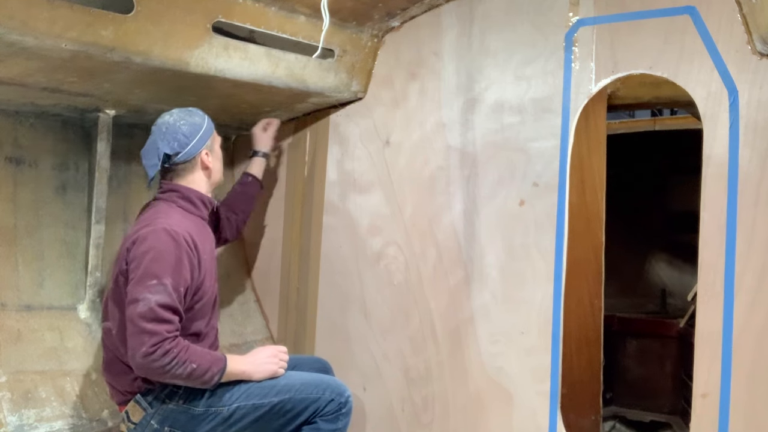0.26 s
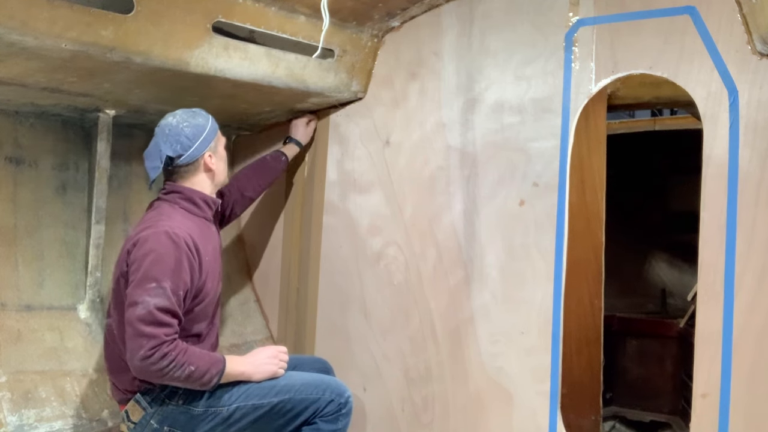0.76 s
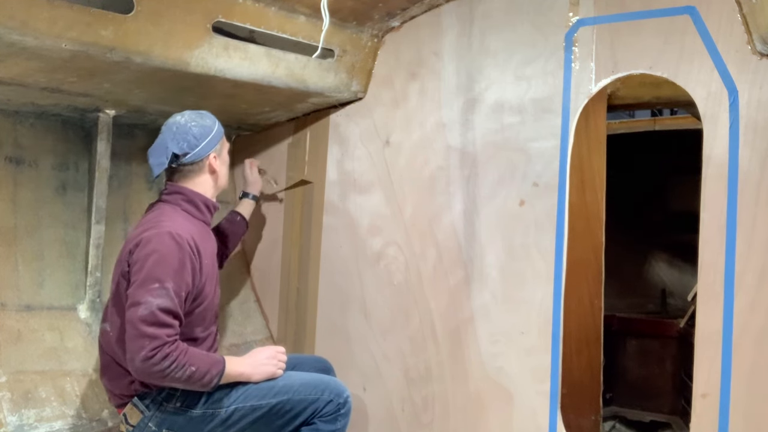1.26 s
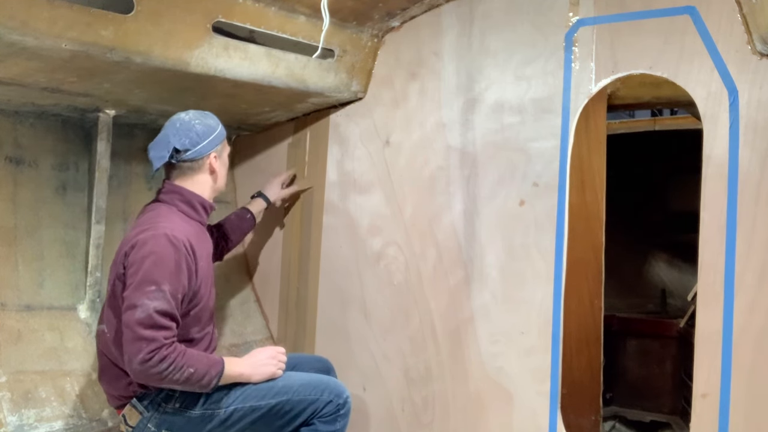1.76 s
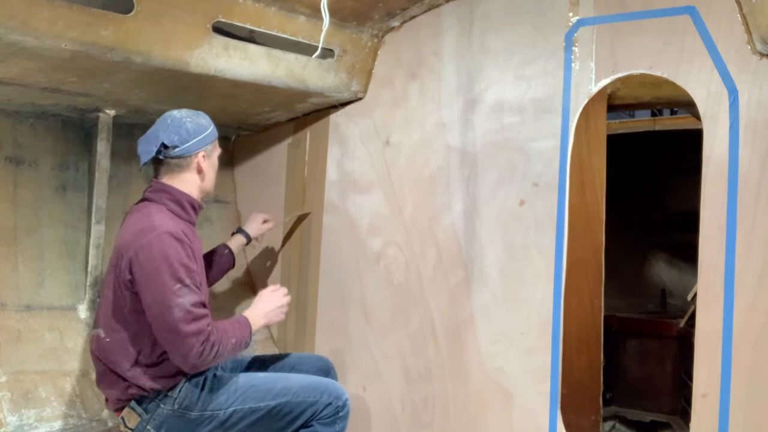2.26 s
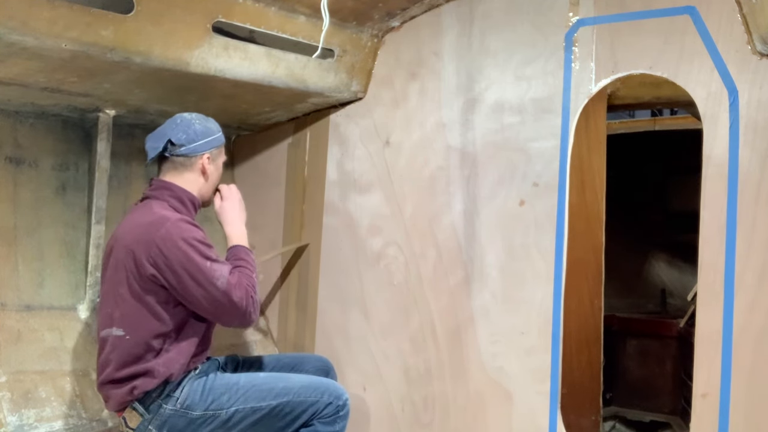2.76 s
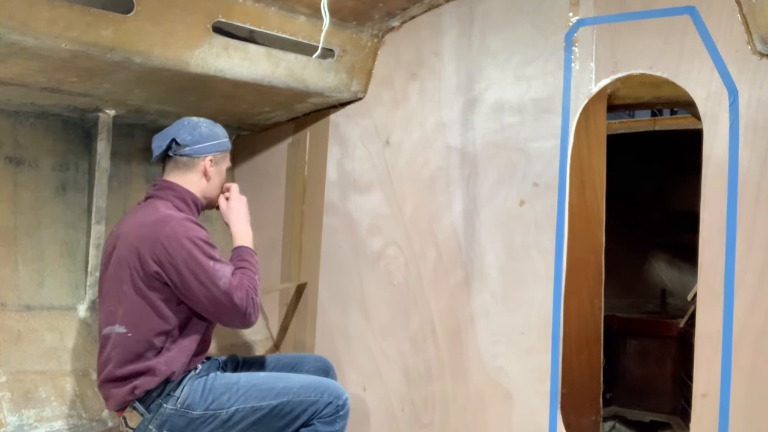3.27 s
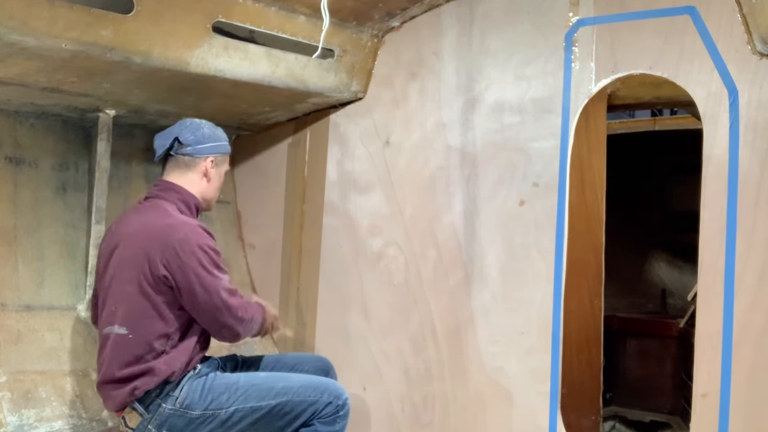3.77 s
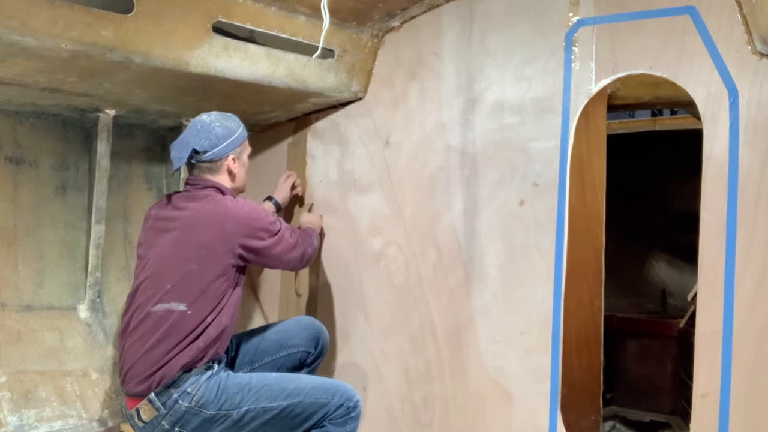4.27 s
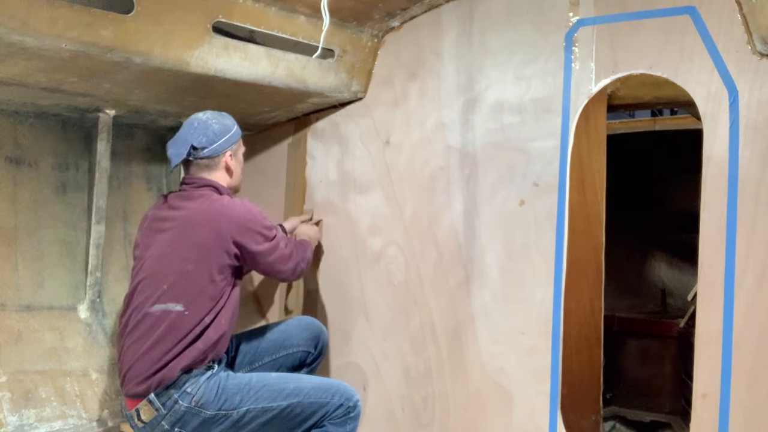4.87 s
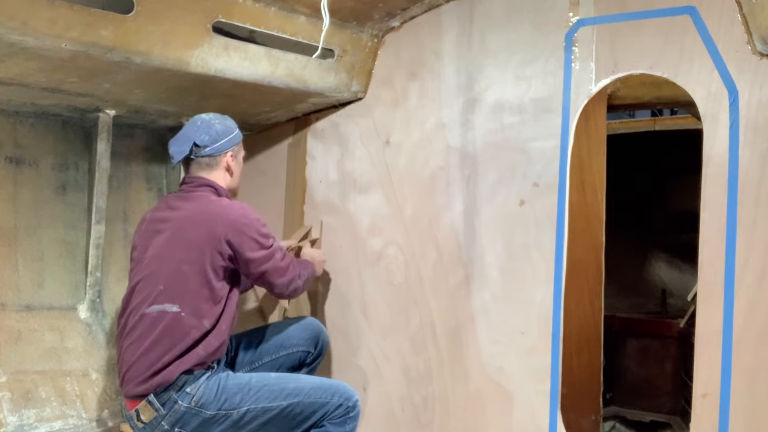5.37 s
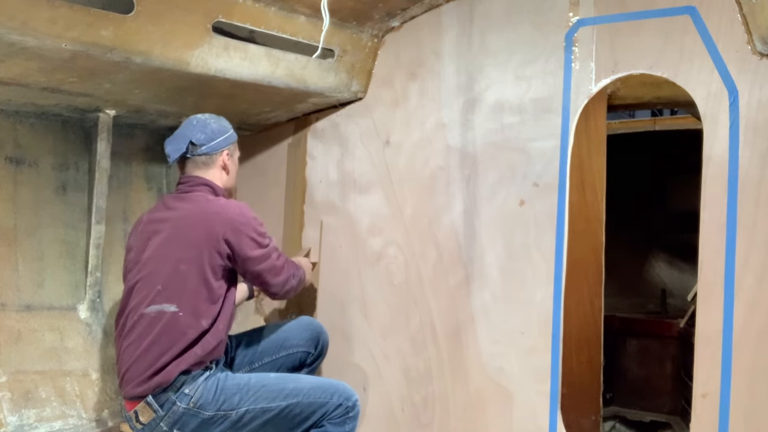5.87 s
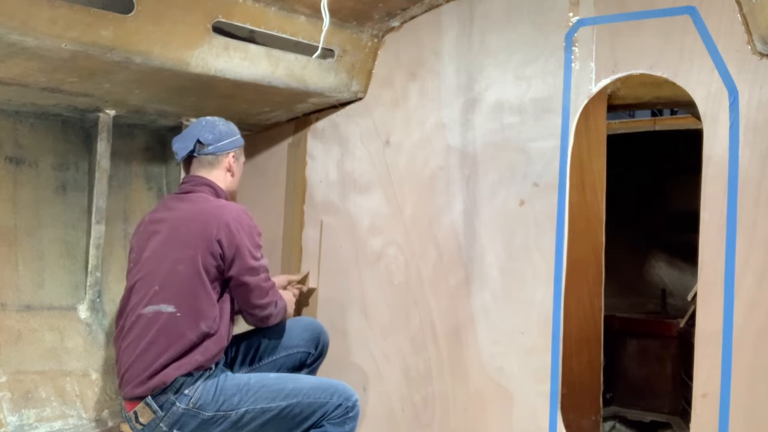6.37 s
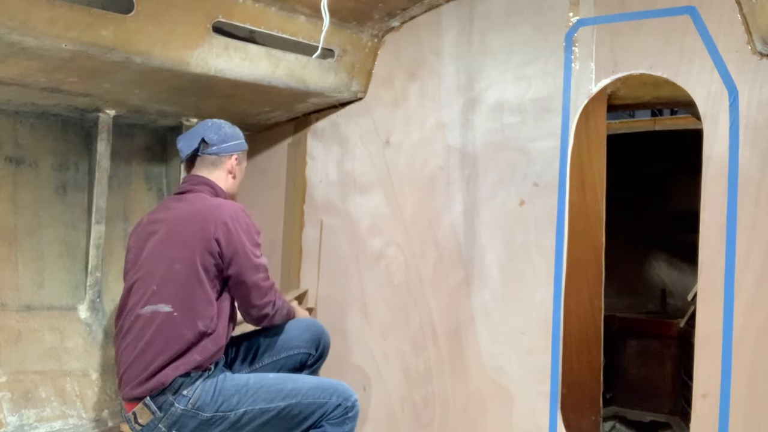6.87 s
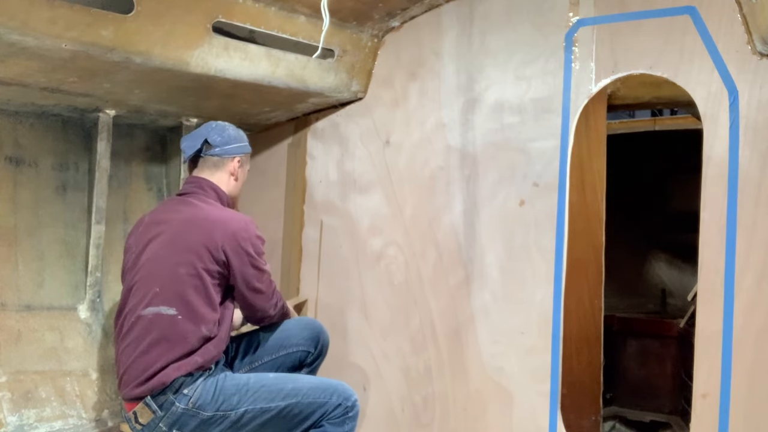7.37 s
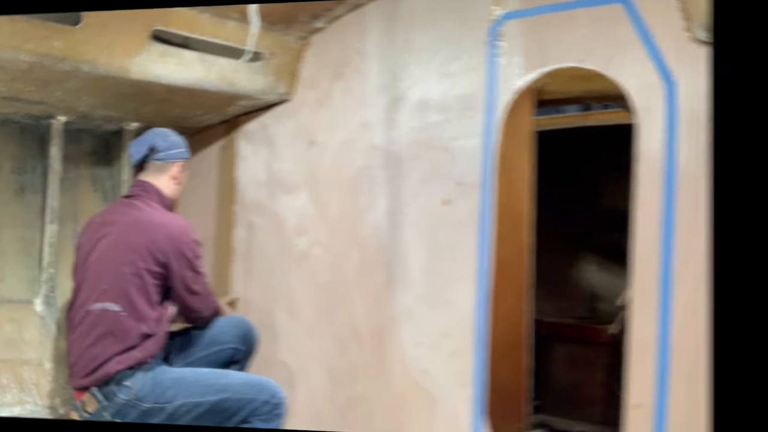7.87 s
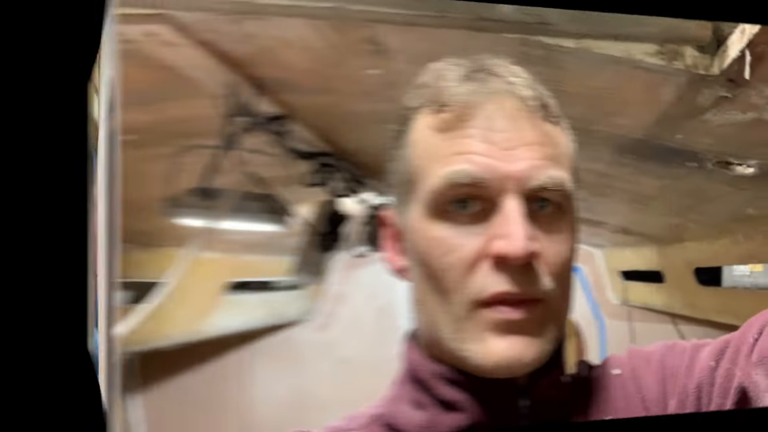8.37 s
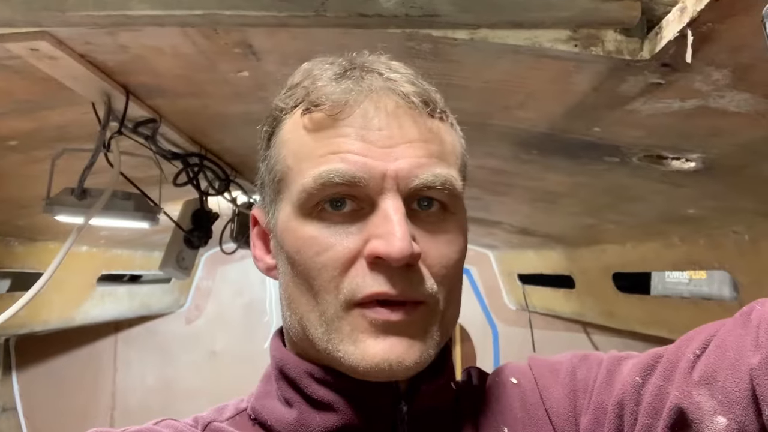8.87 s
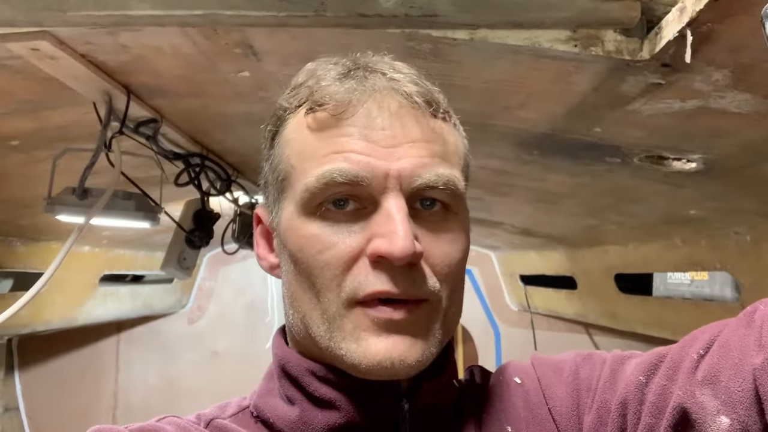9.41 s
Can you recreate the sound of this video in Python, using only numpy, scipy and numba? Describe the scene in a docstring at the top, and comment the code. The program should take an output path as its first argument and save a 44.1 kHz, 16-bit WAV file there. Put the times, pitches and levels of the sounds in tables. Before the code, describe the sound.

In a small, hard, bare boat hull, film-wrapped battens are pulled from glued plywood, heard in stereo from a short distance with brief boxy reverberation. A clipped tail of a snap opens, then sparse faint crinkles until 0.9 s. At 0.95-1.15 a fuller woody crackle breaks loose with a low boom. A light knock with a rip comes at 1.5. From 1.8 to 3.2 long, strong tearing pulls overlap; a hard pop lands at 3.5. From 3.9 to 4.8 it is quiet, with tiny crisp ticks. Sharp clusters crack at 5.2 and 5.45, the latter loudest, with a barely audible knock. Rustling pulls continue from 6.1 to 7, then bright, fizzy crackling at 7.1-7.55 and a last small snap at 7.8. A faint hollow drone fades around 8.4. Soft room air remains, with one short crisp hiss, perhaps parting lips, at 8.6.

```python
"""Inside a bare boat hull, plastic-wrapped battens are peeled off glued plywood.
The film lets go in dense random snaps, in long pulls and quick rips; larger creases crack one by one.
Filters colour the snaps as taut film, slack sheet and plywood; noise through low modes makes the bulkhead boom.
Decaying noise gives film and knocks a short reverberation. A faint drone and room noise lie beneath;
one brief, crisp hiss of filtered noise comes near the end, perhaps lips parting near the microphone."""
import sys
import numpy as np
from scipy import signal
from scipy.fft import rfft, irfft, next_fast_len
from scipy.io import wavfile
from scipy.ndimage import uniform_filter1d
from numba import njit

SR = 44100
rng = np.random.default_rng(int(sys.argv[2]) if len(sys.argv) > 2 else 0)


def generate_wav(sig):
    """Save sig (samples, or channels by samples) to the path in sys.argv[1] as 16-bit PCM at SR."""
    pcm = np.round(np.clip(np.atleast_2d(sig).T, -1, 1) * 32767).astype(np.int16)
    wavfile.write(sys.argv[1], SR, pcm)


N = 425124
T = np.arange(N) / SR

# pulls on the film: start_s, rise_s, hold_s, fade_db_per_s, level_db,
# then relative to that level: body_db, flutter_db (slack sheet), fizz_db; last, on its own scale: boom_db
TUGS = [ (0.0, 0.0006, 0.0013, 186, -21.5, -25.5, -10.5, -3.5, -42),
        (0.28, 0.011, 0.018, 61, -58, -8.5, 1, -4, -53), (0.46, 0.009, 0.032, 150, -57, -16, -15, -7, -62),
        (0.5, 0.015, 0.28, 40, -69.5, -2.5, 2, -3, -49.5),
        (0.712, 0.012, 0.15, 100.2, -45.5, -7, -3, 8, -45.5),
        (0.85, 0.053, 0.047, 130, -36.5, -21, -4, -6, -58),
        (0.957, 0.014, 0.15, 230, -34, -1.5, 5.5, 0.5, -32.5),
        (1.21, 0.011, 0.025, 150, -43.5, -10, -10, -5, -39.5),
        (1.293, 0.0063, 0.011, 349, -39, -11, -5, 4, -54.5),
        (1.335, 0.018, 0.0066, 148, -32, -20, -9.5, -3, -48.5),
        (1.489, 0.0092, 0.031, 108.5, -31.5, -7.5, -4, -0.5, -36),
        (1.738, 0.0029, 0.007, 120.6, -39.5, -18.5, -9.5, 3, -44),
        (1.831, 0.1, 0.1, 108, -20.5, -12.5, -7, -6.5, -44),
        (2.019, 0.047, 0.09, 170, -19.5, -18.5, -12, -4, -44.5),
        (2.19, 0.027, 0.21, 86.64, -23, -18.5, -12.5, -0.5, -48.5),
        (2.46, 0.038, 0.025, 160, -22.5, -21, -16.5, -1, -39.5),
        (2.52, 0.066, 0.29, 50, -32, -16, -6, -1, -39), (2.8, 0.13, 0.34, 192, -24, -17, -16, -2, -61),
        (3.095, 0.038, 0.15, 110, -34, -9, -1.5, -1, -41), (3.37, 0.0089, 0.01, 154, -45, -2, -1, -13, -37),
        (3.504, 0.014, 0.1, 127, -27, -18.5, -15.5, -1, -40.5),
        (3.868, 0.011, 0.14, 50, -52, -19, -7.5, -5, -64),
        (4.028, 0.0039, 0.17, 75, -57.5, 2, 12, -15, -43.5),
        (4.122, 0.0024, 0.0074, 260, -43, -29, -3, 8, -50.5),
        (4.321, 0.032, 0.22, 29.76, -51, -10, -3.5, 7, -54.5),
        (4.665, 0.047, .17, 60, -43, -9.5, -4.5, 7, -50),
        (4.86, 0.073, 0.087, 59.3, -36.5, -10.5, -8, 0, -42),
        (5.02, 0.14, .27, 58.4, -39.5, -5, -1, 4.5, -43.5),
        (5.18, 0.014, 0.018, 169.8, -25, -11, -2.5, 0, -51.5),
        (5.427, 0.016, 0.029, 205.7, -20, -7.5, -1, 1.5, -42),
        (5.58, 0.084, 0.26, 70, -34.5, -10.5, -5, -1.5, -43),
        (5.76, 0.13, 0.32, 60, -41.5, -12, -5, -0.5, -39.5),
        (5.875, 0.0076, .01, 250, -52, -20, -11, 16, -59),
        (6.116, 0.02, 0.03, 119.6, -28.5, -16, -13.5, 5.5, -44.5),
        (6.209, 0.016, 0.069, 130, -26.5, -17, -5.5, 4.5, -39),
        (6.299, 0.11, 0.14, 85.7, -29, -13.5, -8.5, 0, -41.5),
        (6.58, 0.13, .23, 59.6, -39.5, -7.5, -5, 7, -46.5),
        (6.73, 0.0073, 0.0095, 129.9, -31.5, -30, -13.5, -1.5, -64.5),
        (6.8, 0.052, 0.09, 78.8, -28, -23, -7.5, -3, -44.5),
        (6.94, 0.061, 0.058, 110.3, -22.5, -18, -27, 5, -47),
        (7.08, 0.013, 0.06, 154.4, -37, -9.5, -1.5, 17.5, -41),
        (7.196, 0.034, 0.083, 150, -28, -19, -3.5, 12, -37.5),
        (7.448, 0.025, 0.051, 118.7, -30.5, -18.5, -3.5, 9.5, -35),
        (7.659, 0.036, 0.072, 69, -49.5, -7.5, 4, -18, -45.5),
        (7.817, 0.0059, 0.056, 180, -38, -20, -8, -6, -60)]
# ringing modes of the plywood: centre_hz, width_hz, level_db
PLYWOOD = [(337, 62, -3.5), (475, 10, 1.5), (546, 22, -2.5), (657, 7.7, 4.5), (703, 41, 5.5),
           (789, 12, 8.5), (946, 13, 10), (1299, 30, 3.5), (1383, 44, 3), (1800, 16, -6.5)]
# low modes of bulkhead and hull: centre_hz, width_hz, level_db
BOOM = [(50, 3, -40.5), (71.64, 5.2, 0), (72.7, 3.2, 9), (111.3, 6.2, 4), (106.2, 4.1, -0.5),
        (116, 1.3, -7), (210, 58, -16.5)]


def undb(db):
    """Amplitude ratio: decibels to gain."""
    return 10 ** (np.asarray(db) / 20)


def unit(x):
    """Normalisation by mean power: scale to rms 1."""
    return x / np.sqrt(np.mean(x ** 2))


def curves(rows):
    """Linear interpolation in time: each column after start_s, at every sample."""
    s, *columns = np.transpose(rows)
    return [np.interp(T, s, column) for column in columns]


def walk(rate_hz):
    """Random modulation: ramps between chance values, rate_hz of them a second, with rms 1."""
    k = int(SR / rate_hz)
    steps = np.repeat(rng.standard_normal(N // k + 1), k)
    return unit(uniform_filter1d(steps, k)[:N])


def colour(x, points):
    """Linear filtering by a broad frequency response; white noise keeps its power."""
    hz, db = np.transpose(points)
    size = next_fast_len(N + 4096)
    grid_hz = np.maximum(np.fft.rfftfreq(size, 1 / SR), 1)
    response = unit(undb(np.interp(np.log(grid_hz), np.log(hz), db)))
    return irfft(rfft(x, size) * response, size)[:N]


def band(x, hz, width_hz):
    """Simple resonance: a second-order peak with gain 1 at its centre."""
    b, a = signal.iirpeak(hz, hz / width_hz, fs=SR)
    return signal.lfilter(b, a, x + 1e-18)


def ring(x, modes):
    """Modal superposition: a bank of resonances; white noise keeps its approximate power."""
    power = sum(undb(db) ** 2 * np.pi * width_hz / SR for _, width_hz, db in modes)
    return sum(undb(db) * band(x, hz, width_hz) for hz, width_hz, db in modes) / np.sqrt(power)


def effort(t, rise_s, hold_s, fade_db_per_s):
    """Force envelope: linear build-up, hold and exponential decay, t seconds after the start."""
    build_up = np.clip(t / max(rise_s, .001), 0, 1)
    return build_up * undb(-fade_db_per_s * np.maximum(t - rise_s - hold_s, 0))


def tugged(levels_db, fades_db_per_s):
    """Incoherent summation: strength of all pulls, whose overlaps add in power."""
    power = np.full(N, 1e-14)
    for (start_s, rise_s, hold_s, *_), db, fade in zip(TUGS, levels_db, fades_db_per_s):
        span = slice(max(int(start_s * SR), 0), int((start_s + 2) * SR))
        power[span] += (undb(db) * effort(T[span] - start_s, rise_s, hold_s, fade)) ** 2
    return np.sqrt(power)


def pulls():
    """Power-weighted mixing: strength of the pull and its (body, flutter, fizz) dB at every sample."""
    *_, fade, db, body_db, flutter_db, fizz_db, _ = np.transpose(TUGS)
    pull = tugged(db, fade)
    tone_db = [20 * np.log10(tugged(db + part_db, fade) / pull) for part_db in (body_db, flutter_db, fizz_db)]
    return pull, tone_db


def radiate(snaps, body_db, flutter_db, fizz_db, wood_db=-5, deep_db=-5):
    """Parallel radiation paths: snaps sound from taut film, slack sheet and the plywood they stick to."""
    # frequency responses, woody body, its lowest tones, slack sheet, taut film, fizz: frequency_hz, level_db
    body_points, deep_points = [(280, -31.5), (470, 1.5), (620, 4.5), (900, 0.5), (1250, -13.5),
                                (2000, -32.5)], [(110, -19), (190, -7), (260, -5), (350, -3), (450, -0.5),
                                              (650, -18), (1200, -44)]
    flutter_points = [(450, -34.5), (800, -9.5), (1150, 0.5), (1900, -0.5), (2700, -5.5), (4200, -15.5),
                      (7000, -29.5)]
    crackle_points, fizz_points = [(900, -37.5), (1800, -9), (2700, -3), (3800, 1.5), (5500, 1),
                                   (7500, 3.5), (9500, -6), (12000, -8), (16000, -27.5)], [(4000, -30), (7000, -8.5), (10000, 4.5), (12300, -2.5),
                                                    (14000, -3.5), (15700, -13.5), (17000, -35.5)]
    # relative level of the lowest wooden tones, which changes with the place on the panel: start_s, level_db
    depth_rows = [(0, 7), (1.0, 2.5), (1.6, 9), (2.1, -12.5), (2.6, 4.5), (3.2, 7), (4.8, 9.5), (5.2, -3),
                  (5.5, -24), (5.7, 4), (6.5, 4.5), (7.5, 12.5)]

    depth_db, = curves(depth_rows)
    push = snaps * undb(body_db)
    wood = colour(push, body_points)
    wood += colour(push * undb(depth_db + deep_db), deep_points)
    wood += undb(wood_db) * ring(push, PLYWOOD)
    slack_sheet = colour(snaps * undb(flutter_db), flutter_points)
    taut_film = colour(snaps, crackle_points) + colour(snaps * undb(fizz_db), fizz_points)
    return wood + slack_sheet + taut_film


def crinkles(pull, count=1500, db=-1.0, spread_db=4.0, centre_hz=3800, octaves=1.1, cycles=2.2):
    """Buckling: small facets snap at random, each a brief damped sine scaled by the pull."""
    out, t = np.zeros(N + SR), T[:SR // 80]
    for when, size, pitch in rng.random((count, 3)):
        start = int(when * N)
        hz = min(centre_hz * 2 ** (octaves * (2 * pitch - 1)), SR / 3)
        strength = pull[start] * undb(db - spread_db * np.log(max(size, .03)))
        decay = np.exp(-t * hz / cycles)  # by a factor e in this many cycles
        out[start:start + len(t)] += strength * np.sin(2 * np.pi * hz * t) * decay
    return out[:N]


def peeling(pull, tone_db, per_second=7000, catch_hz=130, catch_db=0.78, largest=4.1,
            surge_hz=25, surge_db=0.29):
    """Stick-slip fracture: glue bonds break in a dense stream as the peel line catches and slips."""
    # how unevenly the film lets go: start_s, snap_size_spread_db
    grain_rows = [(0, -2.5), (1.05, 3.5), (2.0, 3), (2.5, 2.5), (3.1, -0.5), (4.4, 6), (5.2, 3), (5.5, 3.5),
                  (6.5, 3), (7.0, 3.5), (7.3, -0.5), (7.9, 3)]

    spread_db, = curves(grain_rows)
    sizes = undb(spread_db * np.minimum(rng.exponential(size=N), largest))
    breaks = rng.random(N) < per_second / SR
    snaps = breaks * sizes * rng.choice([-1, 1], N) * undb(catch_db * walk(catch_hz))
    snaps /= np.sqrt(uniform_filter1d(snaps ** 2, SR // 20) + 1e-9)  # even level, so the pull sets loudness
    pull = pull * undb(surge_db * walk(surge_hz))
    return radiate(snaps * pull, *tone_db) + crinkles(pull)


def folds(x, depth=0.27, wander_hz=22):
    """Time-varying resonance: as the sheet changes shape, each of its modes swells and fades by itself."""
    # folds of the loose sheet: centre_hz, width_hz
    fold_modes = [(1050, 220), (1330, 170), (1780, 110), (2050, 290), (2510, 92), (2850, 400), (3570, 250),
                  (4200, 240), (5100, 670), (6500, 97)]
    return x + sum(band(x, hz, width_hz) * depth * np.tanh(walk(wander_hz)) for hz, width_hz in fold_modes)


def boom(left_db=-5.0, right_db=0.4, apart=0.27, lowest_hz=42, fade_db_per_s=42):
    """Forced vibration: each pull shakes the bulkhead, which drums on in its low modes."""
    flex = tugged([tug[-1] for tug in TUGS], [fade_db_per_s] * len(TUGS))
    shake = np.array([ring(rng.standard_normal(N), BOOM) for _ in range(3)])
    shake = signal.sosfilt(signal.butter(3, lowest_hz, "high", fs=SR, output="sos"), shake)
    shake /= np.sqrt(uniform_filter1d(shake ** 2, SR // 8))
    stereo = shake[0] + apart * shake[1:]  # one shared part and one for each side
    return stereo * flex * undb([[left_db], [right_db]])


def drone(left_db=-65, right_db=-64, hz=338, width_hz=90, until_s=8.4, fade_s=0.43, apart=1.0):
    """Narrow-band noise: a faint, hollow background tone, which fades out after the work."""
    tone = []
    for _ in range(3):
        once = band(rng.standard_normal(N), hz, width_hz)
        tone.append(unit(band(once, hz, width_hz)))
    tone = np.array(tone)
    fade = np.clip((until_s - T) / fade_s + .5, 0, 1)  # centred on until_s
    return (tone[0] + apart * tone[1:]) * undb([[left_db], [right_db]]) * fade


def air(level_db=-63, apart=0.64, sway_db=-3.2, sway_hz=4):
    """Partly correlated broadband noise: faint room noise that sways a little in level."""
    # spectrum of still air in the hull: frequency_hz, density_db
    air_points = [(25, -11), (55, 0), (120, -11), (250, -16), (500, -14), (800, -15), (1100, -24),
                  (2000, -28), (4000, -38), (8000, -45), (15000, -54)]
    noise = np.array([colour(rng.standard_normal(N), air_points) for _ in range(3)])
    return undb(level_db + sway_db * walk(sway_hz)) * (noise[0] + apart * noise[1:])


@njit
def sweep(x, hz, q):
    """State-variable resonance: a moving centre frequency, gain 1 there."""
    y, band_state, low_state = np.empty(len(x)), 0., 0.
    for i in range(len(x)):
        g = np.tan(np.pi * hz[i] / SR)
        v = (band_state + g * (x[i] - low_state)) / (1 + g * (g + 1 / q))
        band_state = 2 * v - band_state
        low_state += 2 * g * v
        y[i] = v / q
    return y


def strips(x, q=5.5, edge_s=0.025):
    """Resonance of a taut strip: its pitch glides as the free length of film changes."""
    # strips drawn taut: start_s, length_s, from_hz, to_hz, boost_db
    strip_rows = [(0.284, 0.1, 4300, 3900, 7), (0.48, 0.14, 1600, 1600, 0), (1.82, 0.25, 1400, 2000, -7.5),
                  (2.03, 0.099, 3830, 5200, -4.5), (2.217, 0.13, 3100, 3500, -2.5),
                  (2.454, 0.12, 4170, 3680, 1.5), (2.933, 0.19, 4110, 2980, -8),
                  (3.097, 0.27, 4400, 5360, -7), (3.48, 0.12, 2800, 3100, -15.5),
                  (4.784, 0.12, 3100, 3300, 4.5), (5.193, 0.11, 3700, 4210, -5),
                  (5.449, 0.074, 3900, 3200, 6.5), (6.122, 0.22, 3420, 3130, -4),
                  (6.192, 0.11, 3150, 2400, -8), (7.415, 0.095, 3300, 3100, -0.5),
                  (7.806, 0.082, 2520, 2400, 2)]
    out = x.copy()
    for start_s, length_s, from_hz, to_hz, db in strip_rows:
        span = slice(int(start_s * SR), int((start_s + length_s) * SR))
        t = T[span] - start_s
        taut = np.clip(np.minimum(t, length_s - t) / edge_s, 0, 1)
        glide_hz = np.geomspace(from_hz, to_hz, len(t))
        out[span] += undb(db) * taut * sweep(x[span], glide_hz, float(q))
    return out


def cracks(wood_db, crumple_db=-6, crumple_s=0.0049, body_db=-5, flutter_db=-8, woody_flutter_db=-1):
    """Snap-through buckling: a crease pops, smaller folds follow; fuller where film still grips the wood."""
    # single creases: start_s, level_db, fizz_db
    crack_rows = [(0.2864, -34, -19), (0.4633, -37, -7), (0.5946, -41.5, -4), (0.7107, -39, 7),
                  (0.9591, -16, -10), (0.976, -16.5, -8), (0.989, -24.5, -12), (1.009, -14, -14),
                  (1.022, -15, -14), (1.038, -15, -10), (1.0614, -13.5, -10), (1.101, -15, -10),
                  (1.11, -15.5, -8), (1.127, -26.5, -14), (1.3, -26, -6.5), (1.492, -23, 2),
                  (1.743, -33, 11), (1.832, -21.5, -10), (2.479, -16, 6), (2.4993, -23.5, -2),
                  (2.788, -18, 0), (3.107, -16, -1), (3.377, -21, -8), (3.46, -18, -12),
                  (3.508, -10.5, -20), (3.872, -35, 1), (4.1247, -31, 5), (4.128, -25, -2),
                  (4.3222, -39, 5), (4.364, -40, 13), (4.4082, -32, 14), (4.4474, -30.5, 3),
                  (4.4561, -28.5, 12), (4.569, -37.5, 16), (4.6678, -39, 12), (4.7426, -37.5, 15.5),
                  (4.875, -20.5, 3.5), (4.937, -17, 2.5), (5.1842, -9, -4.5), (5.1948, -11, -8),
                  (5.2079, -8, -4), (5.216, -8.5, -5.5), (5.223, -12.5, -5), (5.229, -9, -6),
                  (5.4176, -10, -5.5), (5.4445, -4.5, -8), (5.452, -14.5, -9.5), (5.459, -23, -9),
                  (5.468, -12, -6), (5.492, -14.5, -7.5), (6.121, -26, 1), (6.1392, -25.5, 1),
                  (6.1514, -24.5, 2), (6.1883, -16.5, -5), (6.2265, -20.5, 14), (6.738, -18, -19),
                  (7.095, -14.5, 8), (7.1106, -33, 10), (7.129, -14, 11), (7.147, -16.5, 13.5),
                  (7.1986, -10, 8), (7.225, -17.5, 9), (7.2406, -20, 12), (7.272, -14, 9),
                  (7.2852, -25.5, 14), (7.3027, -16, 4), (7.309, -17, 16), (7.3265, -9.5, 3),
                  (7.45, -12, 8.5), (7.4812, -10.5, 10), (7.51, -11, 9.5), (7.538, -12.5, 11.5),
                  (7.823, -28.5, 2)]
    snaps, t = np.zeros(N), T[:SR // 30]
    for start_s, db, _ in crack_rows:
        crumple = rng.standard_normal(len(t)) * undb(crumple_db) * np.exp(-t / crumple_s)
        crumple[0] = 2  # the first pop
        start = int(start_s * SR)
        snaps[start:start + len(t)] += undb(db) * crumple
    _, fizz_db = curves(crack_rows)
    sheet_db = np.maximum(flutter_db, wood_db + woody_flutter_db)
    return radiate(snaps, wood_db + body_db, sheet_db, fizz_db)


def knock(contact_s=0.00011):
    """Impulse excitation: a short wooden contact sets plywood and bulkhead modes ringing."""
    # a batten knocks on the plywood as it comes free: start_s, ring_db, boom_db
    knock_rows = [(1.492, -18.5, -29), (5.446, -29.5, -45)]
    pushes = np.array([np.exp(-((T - start_s) / (contact_s / 2)) ** 2) for start_s, _, _ in knock_rows])
    _, ring_db, boom_db = np.transpose(knock_rows)
    return ring(undb(ring_db) @ pushes, PLYWOOD) + ring(undb(boom_db) @ pushes, BOOM)


def hiss(rise_s=0.0086, hold_s=0.023, fade_db_per_s=120, db=-59, grain_db=2.5, grain_hz=220, apart=0.96):
    """Enveloped noise: one brief, crisp hiss, perhaps lips parting near the microphone, which stops short."""
    # colour of the hiss: frequency_hz, level_db
    hiss_points = [(500, -28), (900, -20), (1900, -22), (2400, -10), (5900, -1), (8000, -1), (12500, -7),
                   (16000, -28)]
    start_s, end_s, stop_s = 8.571, 8.682, .02
    noise = np.array([colour(rng.standard_normal(N), hiss_points) for _ in range(3)])
    level = effort(T - start_s, rise_s, hold_s, fade_db_per_s) * np.clip((end_s - T) / stop_s, 0, 1)
    return (noise[0] + apart * noise[1:]) * level * undb(db + grain_db * walk(grain_hz))


def hull(x, t60_low=0.52, t60_high=0.006, wet_db=-3.5, wet_high_db=-19.5, direct_db=-2.0, split_hz=6800,
         gap_s=0.0017, near_db=-5.0, t60_near=0.031):
    """Exponential reverberation (t60 in s): direct sound, quick corner slap, dense echoes; treble dies first."""
    t = T[:SR // 2]
    low_pass = signal.butter(2, split_hz, fs=SR, output="sos")
    out = []
    for _ in range(2):
        echoes = rng.standard_normal(len(t))
        low = signal.sosfiltfilt(low_pass, echoes)
        parts = [(low, t60_low, wet_db), (low, t60_near, near_db), (echoes - low, t60_high, wet_high_db)]
        response = np.zeros(len(t))
        for part, t60, db in parts:
            unit_energy = np.sqrt(2 * np.log(1000) / t60 / SR)  # for white noise under this decay
            response += part * undb(db) * 1000 ** (-t / t60) * unit_energy
        response *= np.clip(t / gap_s - .5, 0, 1)  # echoes set in around gap_s
        response[0] = undb(direct_db)
        out.append(signal.oaconvolve(x, response)[:N])
    return np.array(out)


def places(x, count=4):
    """Position-dependent impulse response: each new pull moves on to the next of a few spots in turn."""
    spot = np.searchsorted(sorted(tug[0] for tug in TUGS), T) % count
    out = np.zeros((2, N))
    for k in range(count):
        share = np.abs(uniform_filter1d(1. * (spot == k), SR // 500))
        out += hull(x * np.sqrt(share))  # power crossfade between spots
    return out


def scene(lean=0.31, lean_hz=330, lean_width_hz=750, work_db=-1.97):
    """Superposition: film and knocks reverberate, low wooden tones lean right; the other layers are added."""
    pull, tone_db = pulls()
    film = strips(folds(peeling(pull, tone_db) + cracks(tone_db[0])))
    work = places(undb(work_db) * film + knock())
    leaning = lean * band(work, lean_hz, lean_width_hz) * np.array([[-1], [1]])
    return work + leaning + boom() + hiss() + drone() + air()


def record(dry, merge_hz=7200, wide_db=2.5, top_hz=15900):
    """Phase difference of spaced ports: they share one treble signal, opposed in phase near 9 kHz."""
    # half the phase of left minus right: frequency_hz, phase_rad
    phase_points = [(150, 0), (430, -1.25), (690, -1.6), (1380, -2.45), (2930, -3.2), (4500, -3),
                    (7000, -2.35), (8000, -1.86), (8600, -1.6), (9500, -1.55), (10200, -1.86),
                    (11000, -2.29), (12000, -2.72), (13000, -3.05)]
    size = next_fast_len(N + 4096)
    hz = np.fft.rfftfreq(size, 1 / SR)
    left, right = rfft(dry, size)
    mid = (left + right) / 2
    side = (left - right) / 2 * undb(wide_db) / (1 + (hz / merge_hz) ** 10)
    turn = np.exp(1j * np.interp(hz, *np.transpose(phase_points)))
    ports = irfft(np.array([(mid + side) * turn, (mid - side) / turn]), size)[:, :N]
    ports = 1.238 * np.tanh(ports / 1.38)  # the loudest peaks are rounded
    return signal.sosfilt(signal.ellip(10, .2, 80, top_hz, fs=SR, output="sos"), ports)


dry = scene()
out = record(dry)
generate_wav(out)
```